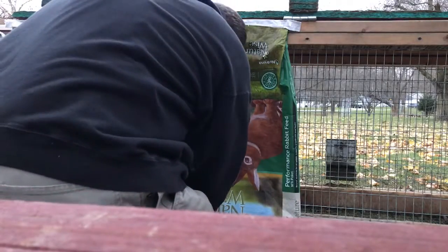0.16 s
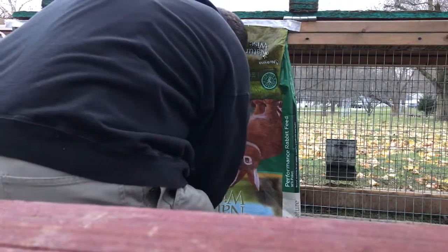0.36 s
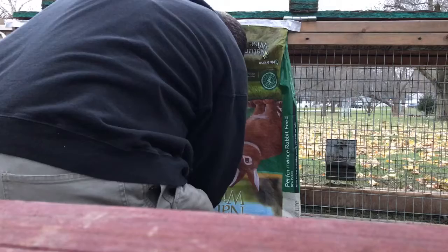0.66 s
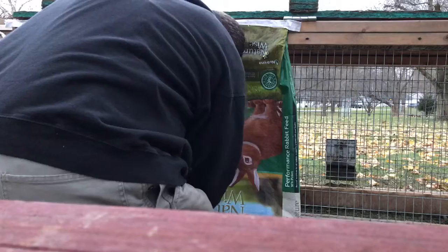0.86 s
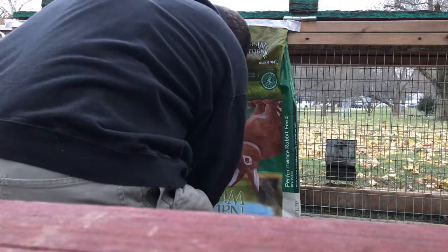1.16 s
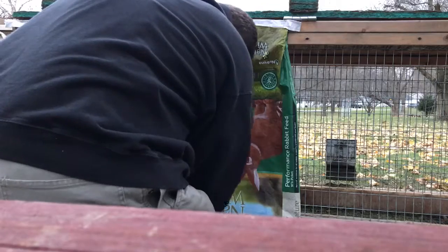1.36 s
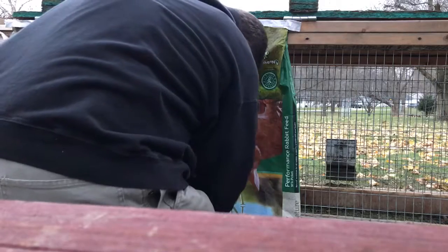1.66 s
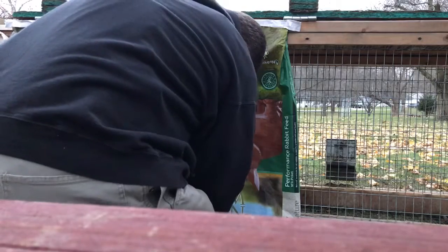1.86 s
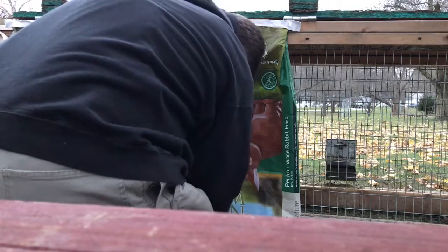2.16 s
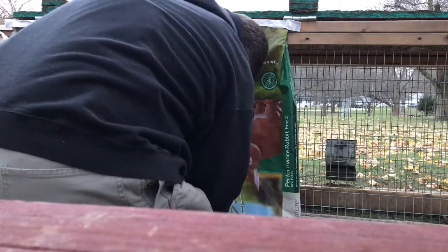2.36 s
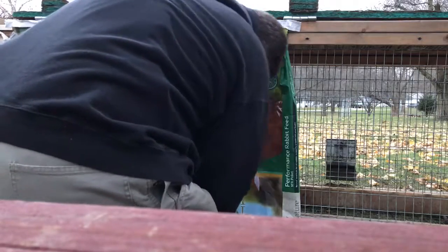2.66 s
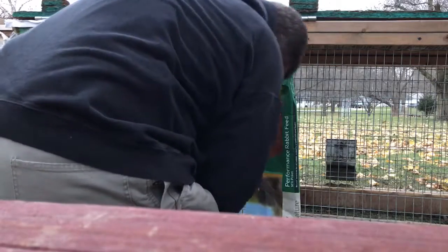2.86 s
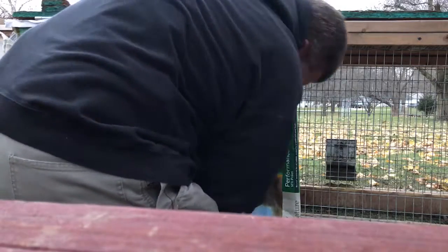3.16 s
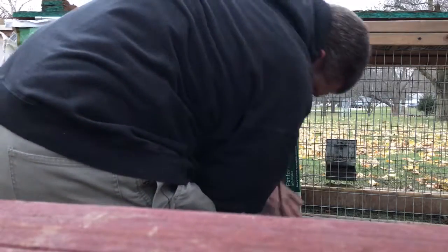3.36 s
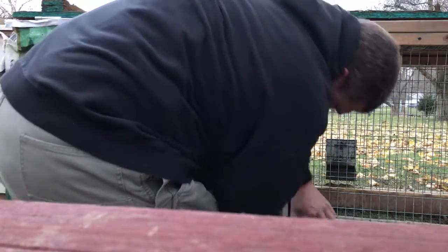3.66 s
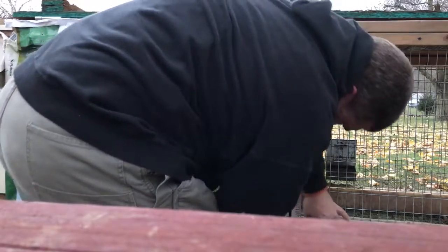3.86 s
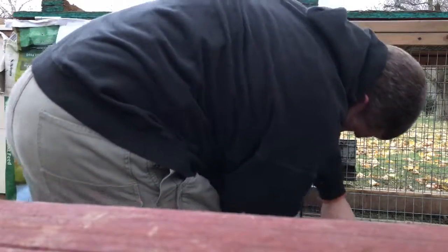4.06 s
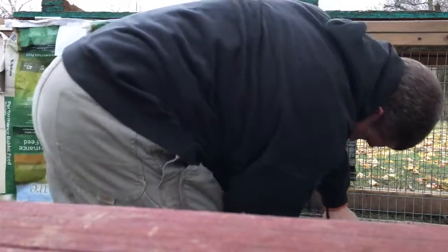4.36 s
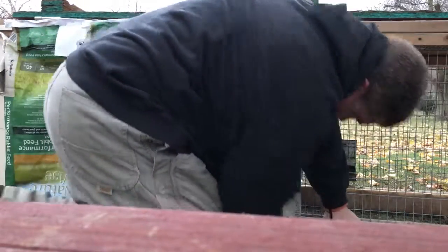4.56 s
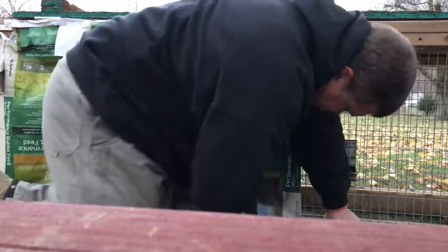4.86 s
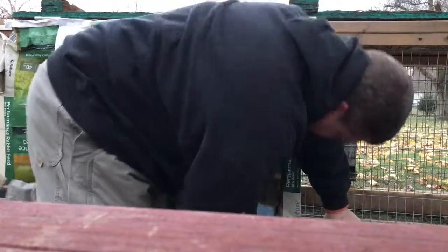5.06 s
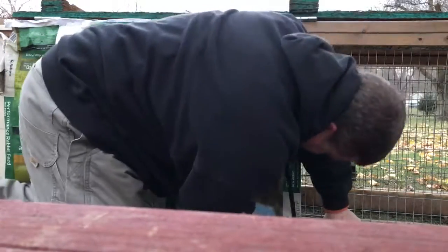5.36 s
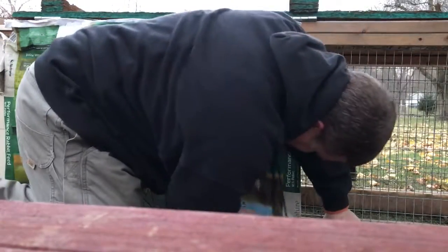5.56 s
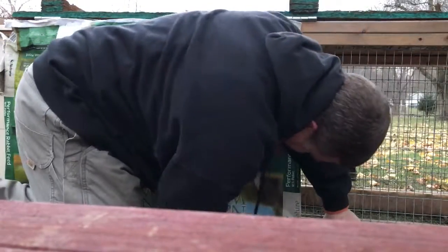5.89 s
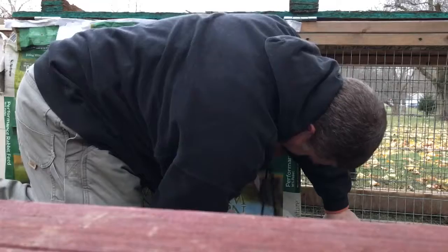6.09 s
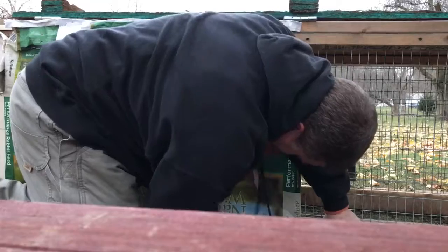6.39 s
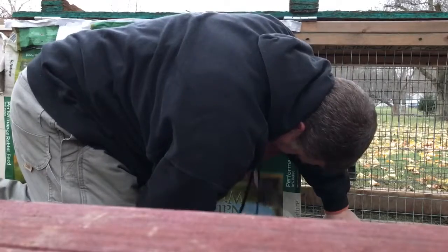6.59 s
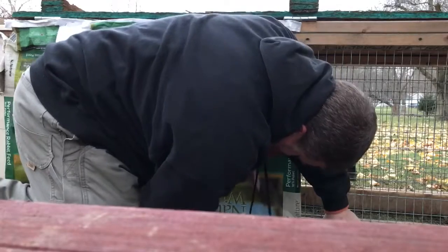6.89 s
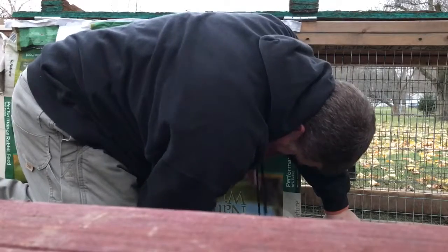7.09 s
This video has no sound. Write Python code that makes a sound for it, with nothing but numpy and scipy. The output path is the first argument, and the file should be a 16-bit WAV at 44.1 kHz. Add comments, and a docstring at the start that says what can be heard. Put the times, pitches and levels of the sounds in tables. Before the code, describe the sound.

Six sharp staple gun shots crack into a wooden pen frame at uneven intervals, with plastic bag rustling, small metal ticks and faint distant traffic hum.

```python
"""A yard outdoors: close to the microphone a kneeling man fires six staples into the wooden frame of a wire pen.
Each shot is a steel crack of filtered noise; dying modes ring the boards, and fading noise answers from the yard.
Between shots the tool and the wire tick (short rings), the handle springs back, and the frame is bumped.
A feed bag rustles and creases (noise shaped by random grains, and sharp pulses).
Far off there is a wash of traffic noise, and two engines hum as harmonics of their turning rates."""
import sys
import numpy as np
from scipy import signal
from scipy.fft import rfft, irfft
from scipy.io import wavfile

SR = 44100
rng = np.random.default_rng(int(sys.argv[2]) if len(sys.argv) > 2 else 0)


def inscribe(sig):
    """Save sig as 16-bit PCM at rate SR to the path in sys.argv[1].

    A 1-D sig is mono; a 2-D sig holds one channel per row.
    Samples are clipped to [-1, 1] before scaling.
    """
    pcm = np.round(np.clip(np.atleast_2d(sig).T, -1, 1) * 32767)
    wavfile.write(sys.argv[1], SR, pcm.astype(np.int16))


N = 318843  # length in samples

# colour of a sharp metal click: (f/Hz, level/dB)
STEEL_COLOUR = [(500, -26), (2000, -2.5), (4000, -3.5), (8000, -6.5), (11000, -12.5), (16000, -13.5)]
# bending modes of the long bottom rail: (f/Hz, level/dB, t60/s)
RAIL_MODES = [(180.9, 1, 0.21), (227, -6, 0.37)]
# colour of crinkling woven plastic: (f/Hz, level/dB)
CRINKLE_COLOUR = [(1500, -9.5), (2800, 2), (3700, 6), (5200, -4), (8000, -6.5), (16000, -13.5)]


def amp(db):
    """Amplitude factor of a level in dB."""
    return 10 ** (np.asarray(db) / 20)


def unit(x):
    """Scales x to an RMS of one."""
    return x / np.sqrt(np.mean(x ** 2) + 1e-20)


def read(points, hz):
    """A table's value at hz, on a log-frequency axis; the added 1 Hz keeps the log finite at zero."""
    f, value = np.transpose(points)
    return np.interp(np.log(hz + 1), np.log(f), value)


def clock(seconds):
    """Time axis in s, from zero."""
    return np.arange(int(seconds * SR)) / SR


def add(mix, s, sound):
    """Lays a sound into the mix at s seconds, cut off at the end of the mix."""
    part = mix[max(round(s * SR), 0):][:len(sound)]
    part += sound[:len(part)]


def rise(t, seconds):
    """A smooth onset from 0 towards 1, at 63 % after the given time."""
    return 1 - np.exp(-(t / seconds) ** 2)


def resonances(size, depth_db, width_hz):
    """Gain over frequency of many small resonances at chance places."""
    hz = np.fft.rfftfreq(size, 1 / SR)
    heights = rng.standard_normal(len(hz))
    return amp(depth_db * np.interp(hz / width_hz, np.arange(len(hz)), heights))


def noise(spectrum, size, ripple_db=0):
    """Random-phase noise of unit RMS with a given colour, perhaps rippled by resonances."""
    hz = np.fft.rfftfreq(size, 1 / SR)
    gain = amp(read(spectrum, hz)) * resonances(size, ripple_db, width_hz=110)
    phase = 2 * np.pi * rng.random(len(hz))
    return unit(irfft(gain * np.exp(1j * phase), size))


def resonant_noise(hz, width_hz, size):
    """White noise through one resonance of the given bandwidth, at unit RMS."""
    r = np.exp(-np.pi * width_hz / SR)
    poles = [1, -2 * r * np.cos(2 * np.pi * hz / SR), r * r]
    return unit(signal.lfilter([1, 0, -1], poles, rng.standard_normal(size)))


def fade(x, t, t60s):
    """Lets each band of x die at its own speed, as treble and bass do in the open."""
    hz, z = np.fft.rfftfreq(len(x), 1 / SR), rfft(x)
    centres, times = np.transpose(t60s)
    out = np.zeros(len(x))
    for row, t60 in zip(np.eye(len(times)), times):
        share = np.interp(np.log(hz + 1), np.log(centres), row)  # triangular band around its centre
        out += irfft(z * share, len(x)) * amp(-60 * t / t60)
    return out


def ring(modes, t, detune=.01, spread_db=2):
    """Dying modes; each blow lands on another spot and weights them anew."""
    chance = rng.uniform(-1.06, 1, (len(modes), 3))  # for level, tuning and phase
    out = np.zeros(len(t))
    for (hz, db, t60), (a, b, c) in zip(modes, chance):
        level = amp(db + spread_db * a - 60 * t / t60)
        out += level * np.sin(2 * np.pi * hz * (1 + detune * b) * t + np.pi * c)
    return out


def click(spectrum, size):
    """One sharp minimum-phase impulse of unit peak with a given colour."""
    log_gain = np.log(amp(read(spectrum, abs(np.fft.fftfreq(size, 1 / SR)))))
    pulse = np.fft.ifft(np.exp(np.conj(signal.hilbert(log_gain)))).real
    return pulse / abs(pulse).max()


def clack(t, db, t60):
    """A short bright burst of steel on steel."""
    return amp(db - 60 * t / t60) * noise(STEEL_COLOUR, len(t)) * rise(t, 0.00065)


def bending_pulse(spectrum, delay_s, lowest_hz, size, knee_hz=980, cut=0.71):
    """A blow that travels along the board: treble first, bass last, thinned towards and below lowest_hz."""
    hz = np.fft.rfftfreq(size, 1 / SR)
    arrival_s = delay_s * np.hypot(1, knee_hz / np.maximum(hz, 80))
    phase = -2 * np.pi * np.cumsum(arrival_s) * hz[1]  # the slope of the phase is the arrival time
    gain = amp(read(spectrum, hz)) * rise(hz, cut * lowest_hz) ** 2
    pulse = irfft(gain * np.exp(1j * phase), size)
    return pulse / abs(pulse).max()


def boom(t, build_s=0.037, swell_db=19):
    """The blow spreads through the pen, whose low modes swell late."""
    # slow sway of the whole pen, ahead of the gain swell_db: (f/Hz, level/dB, t60/s)
    pen_modes = [(96.3, 1, 0.25), (129.1, -12, 0.39), (179.4, -7, 0.22)]
    return amp(swell_db) * ring(pen_modes, t, detune=0.021, spread_db=0) * rise(t, build_s) ** 2


def grains(per_s, size_db, decay_s):
    """Level of many tiny random snaps, a few of them large, that add up in power."""
    sizes = amp(size_db * np.minimum(rng.exponential(1, N), 4))
    snaps = sizes * (rng.random(N) < per_s / SR)
    power = signal.lfilter([1], [1, -np.exp(-2 / (decay_s * SR))], snaps ** 2)
    return unit(np.sqrt(power))


def distance(air_db=-47.5, air_waver_db=0.26, idle_hz=48.77, waver=0.0083, idle_flutter_db=3.5,
             vehicle_db=-46, vehicle_flutter_db=1):
    """Far off: a wash of traffic noise, an engine idling at its firing rate, and a vehicle gathering speed."""
    # colour of distant traffic: (f/Hz, level/dB)
    air_colour = [(24, -37.5), (45, -21), (70, -5.5), (100, -5), (130, -10.5), (290, -23), (450, -32.5),
                  (700, -27.5), (1450, -27.5), (2600, -39), (5200, -49), (16000, -59.5)]
    # level of the idling engine over time: (t/s, first harmonic/dB, second harmonic/dB)
    idle_levels = [(0, -49.5, -53.5), (1.349, -46.5, -51.5), (1.799, -58, -50.5), (3.3, -64, -48),
                   (5.5, -50, -54), (7.23, -66, -56)]
    # harmonics of the vehicle's shaft: (multiple of the shaft rate, level/dB over vehicle_db)
    shaft_orders = [(3, 0), (5, 1.5)]
    slow = [(1, -4.0), (4, -5.0), (14, -46.0), (40, -120)]  # spectrum of slow wavering: (f/Hz, level/dB)
    t = np.arange(N) / SR
    out = amp(air_db + air_waver_db * noise(slow, N)) * noise(air_colour, N)

    angle = 2 * np.pi * np.cumsum(idle_hz * (1 + waver * noise(slow, N))) / SR
    s, first_db, second_db = np.transpose(idle_levels)
    idle = amp(np.interp(t, s, first_db)) * np.sin(angle)
    idle += amp(np.interp(t, s, second_db)) * np.sin(2 * angle)
    out += np.sqrt(2) * idle * amp(idle_flutter_db * noise(slow, N))

    # the vehicle pulls away: its shaft speeds up evenly, then holds
    start_s, swell_s, speed_up_s = 6.2, 0.1, 0.604
    from_hz, to_hz = 23, 25.86
    since = np.maximum(t - start_s, 0)
    shaft_hz = np.interp(since, [0, speed_up_s], [from_hz, to_hz])
    angle = 2 * np.pi * np.cumsum(shaft_hz) / SR
    for order, order_db in shaft_orders:
        level = amp(vehicle_db + order_db + vehicle_flutter_db * noise(slow, N)) * rise(since, swell_s)
        out += np.sqrt(2) * level * np.sin(round(order) * angle)
    return out


def pings(per_s=12, size_db=3, t60=0.016):
    """The bag's edge plucks six wires of the mesh at random, each with its own short note."""
    out, t = np.zeros(N), clock(.04)
    for hz in np.geomspace(3200, 4400, num=6):
        sizes = amp(size_db * np.minimum(rng.exponential(1, N), 2))
        plucks = sizes * (rng.random(N) < per_s / SR)
        note = ring([(hz, 0, t60), (hz * 1.5, -4, t60), (hz * 1.9, -16, t60 / 2)], t)
        out += signal.oaconvolve(plucks, note)[:N]
    return unit(out)


def rustle(fidget_db=-72.5, move_range_db=20.5):
    """Woven plastic and cloth slide and crinkle as he shifts and drags the bag, and never quite rest."""
    # colour of sliding cloth: (f/Hz, level/dB)
    scrape_colour = [(150, 6.5), (500, -2), (1200, -0.5), (2200, -11.5), (4000, -33)]
    # he shifts his weight or his grip: (fullest at t/s, swell/s, settle/s, scrape level/dB, crinkle level/dB)
    moves = [(0.066, 0.054, 0.046, -44.5, -52.5), (1.41, 0.47, 0.087, -51.5, -55),
             (3.709, 0.12, 0.1, -37, -46.5), (4.09, 1, 0.17, -51, -60), (4.83, 0.45, 0.18, -47, -50.5),
             (5.009, 0.065, 0.2, -35, -48), (5.84, 0.45, 0.24, -48.5, -60.5), (6.55, 1, 0.89, -52.5, -62),
             (7.2, 0.71, 0.17, -47, -60.5)]
    t = np.arange(N) / SR
    scrape = noise(scrape_colour, N) * grains(1100, 2.6, .003)
    crinkle = noise(CRINKLE_COLOUR, N) * grains(1200, 3.7, .0011)
    out = amp(fidget_db) * noise(CRINKLE_COLOUR, N) * grains(110, 4, .004)
    # a move gains move_range_db over its swell and loses it as it settles
    for s, swell_s, settle_s, scrape_db, crinkle_db in moves:
        away = np.maximum((s - t) / swell_s, (t - s) / settle_s)
        shape = amp(-move_range_db * np.minimum(away, 10))
        out += shape * (amp(scrape_db) * scrape + amp(crinkle_db) * crinkle)

    # the feed bag is pulled aside in one stroke that slowly loses contact with the mesh
    start_s, attack_s, hold_s, drag_t60 = 3.272, 0.0033, 0.21, 0.35
    drag_scrape_db, drag_crinkle_db = -48, -47.5
    since = np.maximum(t - start_s, 0)
    pull = rise(since, attack_s) * amp(-60 * np.maximum(since - hold_s, 0) / drag_t60)
    out += pull * (amp(drag_scrape_db) * scrape + amp(drag_crinkle_db) * crinkle)

    # wires are plucked most as the stroke dies away
    pings_db, pings_at_s, pings_width_s = -61, 3.58, 0.17
    plucking = rise(since, attack_s) * np.exp(-((t - pings_at_s) / pings_width_s) ** 2)
    return out + amp(pings_db) * plucking * pings()


def creases(t60=0.022, crackle_db=-13):
    """Stiff folds of the bag snap through, each a sharp tick and a short dry crackle."""
    # folds that snap over: (t/s, level/dB)
    folds = [(.082, -38), (.216, -39), (.296, -41), (.478, -37), (0.669, -37.5), (1.55, -35), (2.968, -41),
             (3.361, -31), (3.384, -25), (3.417, -19), (3.488, -27), (3.4995, -27.5), (3.551, -33),
             (3.575, -34), (3.599, -35), (3.609, -30), (3.668, -28), (3.767, -27.5), (3.7867, -27),
             (4.125, -36), (4.989, -24.5), (5.072, -30.5), (5.209, -37.5), (5.815, -36)]
    out, t = np.zeros(N), clock(0.083)
    for s, db in folds:
        crackle = amp(crackle_db - 60 * t / t60) * noise(CRINKLE_COLOUR, len(t))
        add(out, s, amp(db) * (click(CRINKLE_COLOUR, len(t)) + crackle))
    return out


def bumps(t60=0.18, travel_s=0.0016):
    """Hand, knee and gun nudge the frame: a falling knock, a dull thud, then the sway of the pen."""
    # dull bumps on the frame: (t/s, thud level/dB, woody knock level/dB, boom of the pen/dB ahead of its swell)
    nudges = [(1.41, -42.5, -39, -50), (3.724, -33.5, -35, -48), (4.78, -37, -40, -51),
              (5.0253, -28.5, -22.5, -34), (5.8577, -32, -25.5, -40.5), (6.521, -41, -44, -50),
              (6.636, -33.5, -33, -39), (7.179, -44, -36, -44)]
    # colour of the thud: (f/Hz, level/dB)
    thud_colour = [(60, -18), (180, 10), (420, -5), (800, -18), (1500, -13), (4000, -39)]
    # a soft blow carried along the board: (f/Hz, level/dB)
    knock_colour = [(110, 0), (450, 4.5), (720, -9), (1500, -28)]
    out, t = np.zeros(N), clock(0.5)
    for s, thud_db, knock_db, boom_db in nudges:
        thud = amp(thud_db - 60 * t / t60) * noise(thud_colour, len(t)) * rise(t, 0.0034)
        knock = amp(knock_db) * bending_pulse(knock_colour, travel_s, RAIL_MODES[0][0], len(t))
        add(out, s, thud + knock + amp(boom_db) * boom(t))
    return out


def ticks(t60=0.013, echo_db=-16.0, echo_t60=0.13, repeat_s=0.0057, repeat_db=-12):
    """Small metal contacts: a snap that repeats faintly, a short ring and a hollow knock, with close echoes."""
    # ticks of tool and wire: (t/s, tick level/dB, ring f/Hz, hollow knock level/dB, snap level/dB)
    contacts = [(0.0653, -42, 2700, -36, -38), (0.1432, -32.5, 2520, -37.5, -37),
                (0.9279, -40, 3660, -41, -37), (1.372, -44, 3130, -34.5, -36),
                (1.448, -34.5, 4300, -38, -34.5), (1.473, -44, 2850, -33.5, -44),
                (2.2299, -32, 3320, -36, -37), (2.6038, -43.5, 2770, -33.5, -40),
                (3.2964, -33.5, 3350, -26.5, -36), (3.3687, -39, 3520, -34.5, -32),
                (3.4762, -32, 3360, -29, -35), (3.632, -26.5, 3730, -25.5, -37),
                (3.6594, -43, 3260, -23, -50), (3.8595, -30.5, 3750, -33.5, -45),
                (3.946, -47, 2800, -19.5, -65), (4.0995, -39, 2540, -23.5, -58),
                (4.326, -50, 3060, -30.5, -46), (4.8586, -50, 3270, -46, -35.5),
                (4.898, -39, 3900, -31, -44), (4.9998, -43, 2800, -24, -48), (5.027, -32, 2600, -34, -30.5),
                (5.7324, -39, 3030, -37, -44), (5.9429, -36.5, 2840, -21.5, -49),
                (5.9666, -36, 3520, -25.5, -37.5), (6.0617, -35.5, 3170, -35, -47),
                (6.263, -38, 3000, -41, -34), (6.5241, -37.5, 2730, -36.5, -41),
                (6.6377, -41.5, 3040, -32, -32.5), (7.1714, -43, 2870, -33, -32)]
    out, t = np.zeros(N), clock(0.34)
    strike = amp(-60 * t / t60) * rise(t, 0.0005)
    echo = amp(echo_db - 60 * t / echo_t60) * rise(t, 0.0011)
    for s, tick_db, hz, knock_db, snap_db in contacts:
        tick, knock = amp(tick_db), amp(knock_db)
        metal = ring([(hz, 0, .016), (hz * 1.1, -2, .014), (hz * 1.55, -6, .012)], t, spread_db=-6.0)
        hollow = ring([(1228, -1.3, 0.012), (1558, -8.0, 0.013)], t, detune=0.039, spread_db=0.5)
        direct = (tick * metal + knock * hollow) * rise(t, 0.00015)
        scattered = tick * resonant_noise(hz, 1200, len(t))
        scattered += knock * resonant_noise(1100, 450, len(t)) / 2
        snap = amp(snap_db) * noise(STEEL_COLOUR, len(t))
        add(out, s, direct + scattered * echo + snap * (strike + echo))
        add(out, s + repeat_s, amp(repeat_db) * snap * strike)
    return out


def releases(rebound_s=0.018, rebound_db=-10):
    """The handle hits its stop, rings the steel housing and bounces once."""
    # the handle springs back: (t/s, housing ring level/dB, snap level/dB)
    springs = [(1.412, -43, -38.5), (2.6825, -38.5, -36.5)]
    # modes of the steel housing: (f/Hz, level/dB, t60/s)
    housing_modes = [(1240, -2, 0.037), (2630, -1, 0.037), (2920, -4, .025), (3470, 0.5, 0.048),
                     (5750, -16, 0.085)]
    out, t = np.zeros(N), clock(0.24)
    for s, ring_db, snap_db in springs:
        for late_s, db in (0, 0), (rebound_s, rebound_db):
            housing = amp(ring_db + db) * ring(housing_modes, t)
            add(out, s + late_s, housing + clack(t, snap_db + db, 0.04))
    return out


def staples(hold_s=0.0039, near_db=-23, far_db=-43, far_t60=1.38, steel_t60=0.009, spot_t60=0.069,
            spot_damping=0.21, strike_db=-14, latch_db=-47, grind_db=-52,
            mesh_db=-54, mesh_hz=2410, mesh_width_hz=35):
    """The latch slips, the striker rings, the staple seats, the gun kicks back, boards and yard answer."""
    # one row a staple: (t/s, crack level/dB, boards level/dB, rail level/dB, boom of the pen/dB ahead of its swell,
    #   rebound delay/s, rebound level/dB, steel ring f/Hz, its level/dB ahead of a doubling,
    #   seating knock level/dB, its treble delay/s, latch slips this early/s, slip level/dB,
    #   low, middle and high note of the struck spot, each (f/Hz, level/dB))
    shots = [(0.967, -11, -29, -46, -47, 0.016, -16, 3930, -8.5, -15.5, 0.0062, 0.0043, -50, [(560, -21.5),
             (1000, -14.5), (1650, -11)]),
             (2.2990, -12, -29.5, -25, -38.5, 0.015, -14, 3950, -11, -11, 0.0066, 0.0051, -52.5, [(587, -17.5),
             (1000, -20), (1410, -16)]),
             (4.416, -14.5, -23.5, -28, -36.5, 0.017, -18, 3580, -9, -10, 0.0066, 0.008, -28, [(392, -20),
             (991, -18.5), (2130, -13)]),
             (5.3942, -15, -27.5, -25.5, -35.5, 0.017, -25, 3360, -10, -6.5, 0.0072, 0.0039, -30, [(390, -19),
             (895, -13.5), (2700, -23)]),
             (6.1513, -13.5, -21, -35, -36.5, .019, -23, 3110, -17, -13.5, 0.0069, 0.0056, -20.5, [(335, -12.5),
             (721, -15.5), (3270, -21)]),
             (6.9299, -13.5, -22, -35, -34.5, 0.021, -22, 3470, -11, -9, 0.0068, 0.0071, -22, [(350, -16),
             (899, -15), (1680, -19)])]
    # colour of the crack: (f/Hz, level/dB), and how its bands die: (f/Hz, t60/s)
    crack_colour = [(90, -22.5), (200, -9.5), (380, -7), (520, -5), (1200, -4.5), (1660, -2), (2550, -5.5),
                    (3550, -2.5), (4580, -2.5), (5050, -19.5), (7900, -12), (10400, -15), (16000, -14.5)]
    crack_t60s = [(200, 0.066), (700, 0.16), (2000, 0.09), (4000, 0.044), (6000, 0.055), (15000, 0.023)]
    # a blow carried along the board: (f/Hz, level/dB)
    seat_colour = [(150, -3), (320, 3.5), (500, -4.5), (800, 0), (2000, -7), (3700, -4.5), (5500, -12),
                   (16000, -45)]
    # modes of the frame with the gun pressed on it: (f/Hz, level/dB, t60/s)
    board_modes = [(319.4, -3.5, 0.22), (399, -1, 0.15), (695, -2.5, 0.12), (896, -5.5, 0.17),
                   (1092, -9, 0.28), (1240, -7.5, 0.093), (1650, -12, 0.033), (1980, -5.5, 0.04),
                   (2260, -7, 0.14), (3130, 3.5, 0.079), (3660, -3.5, 0.13), (4060, -6, 0.08),
                   (4290, -5, 0.089), (4560, -6.5, 0.07)]
    # close echoes of the pen: (f/Hz, level/dB), and how their bands die: (f/Hz, t60/s)
    near_colour = [(100, -13), (200, -5), (450, -13), (1000, -4), (1500, -9.5), (2300, -5.5), (2700, -10.5),
                   (3400, -6), (5000, -18), (7500, -18.5), (16000, -29)]
    near_t60s = [(150, 0.62), (1000, 0.44), (4000, 0.28), (15000, 0.25)]
    # echoes from the trees: (f/Hz, level/dB)
    far_colour = [(120, -17), (400, 5.5), (1000, -3.5), (1750, -9.5), (2100, 0), (2450, 1), (2750, -5),
                  (5000, -19.5), (16000, -29.5)]
    out, t = np.zeros(N), clock(0.92)
    for (s, db, boards_db, rail_db, boom_db, rebound_s, rebound_db, steel_hz, steel_db,
         seat_db, seat_s, slip_s, slip_db, spot) in shots:
        # the latch ticks and grinds off the striker just before the blow
        add(out, s - .0215, clack(t, latch_db, 0.1))
        grind = amp(grind_db - 60 * t / .2) * resonant_noise(steel_hz, 900, len(t))
        add(out, s - .013, grind * rise(t, .001))
        slip_ring = ring([(steel_hz, slip_db, .02)], t) * rise(t, 0.00056)
        add(out, s - slip_s, clack(t, slip_db, 0.015) + slip_ring)

        # steel parts chatter for a few milliseconds before the crack dies
        crack = fade(noise(crack_colour, len(t)), np.maximum(t - hold_s, 0), crack_t60s)
        add(out, s, amp(db) * crack * rise(t, 0.002))
        add(out, s + 0.0012, clack(t, strike_db, 0.054))
        steel = 2 * ring([(steel_hz, steel_db, steel_t60)], t, spread_db=0.9)
        add(out, s + 0.0017, steel * rise(t, 0.00055))

        # the staple seats and the wood gives way, most of all at the notes of the struck spot
        add(out, s, amp(seat_db) * bending_pulse(seat_colour, seat_s, spot[0][0], len(t)))
        notes = []
        for hz, note_db in spot:
            notes.append((hz, note_db, spot_t60 * (1000 / hz) ** spot_damping))  # low notes last longer
        wood = amp(boards_db) * ring(board_modes, t, detune=0.014, spread_db=-1.0)
        wood += ring(notes, t, detune=0.0017, spread_db=0.0)
        rail = amp(rail_db) * ring(RAIL_MODES, t, spread_db=1.5)
        add(out, s + 0.002, (wood + rail) * rise(t, 0.0015))
        add(out, s, amp(boom_db) * boom(t))

        # the gun kicks back with a second bright burst
        add(out, s + rebound_s, clack(t, rebound_db, 0.038))

        # the pen resounds, its wire mesh sings on, and a diffuse echo returns from the trees
        near = fade(noise(near_colour, len(t), ripple_db=2.5), t, near_t60s)
        add(out, s, amp(near_db) * near * rise(t, 0.0074))
        far = amp(far_db) * noise(far_colour, len(t), ripple_db=2.5)
        mesh = amp(mesh_db) * resonant_noise(mesh_hz * rng.uniform(0.95, 1.02), mesh_width_hz, len(t))
        add(out, s, (far + mesh) * amp(-60 * t / far_t60) * rise(t, 0.059))
    return out


def scene():
    """All layers, from the far engines to the staples, on one channel."""
    background = distance() + rustle() + creases()
    close = bumps() + ticks() + releases() + staples()
    return (background + close)[None]


def record(dry, ceiling=1.0, rumble_hz=33, edge_hz=15850):
    """The loudest peaks are rounded off; the microphone sheds deep rumble; then the band limit."""
    rounded = dry / (1 + (dry / ceiling) ** 4) ** (1 / 4)
    highpass = signal.butter(4, rumble_hz, "highpass", fs=SR, output="sos")
    lean = signal.sosfilt(highpass, rounded)
    lowpass = signal.firwin(255, edge_hz, window=("kaiser", 8), fs=SR)
    return signal.oaconvolve(lean, lowpass[None], "same")


dry = scene()
out = record(dry)
inscribe(out)
```